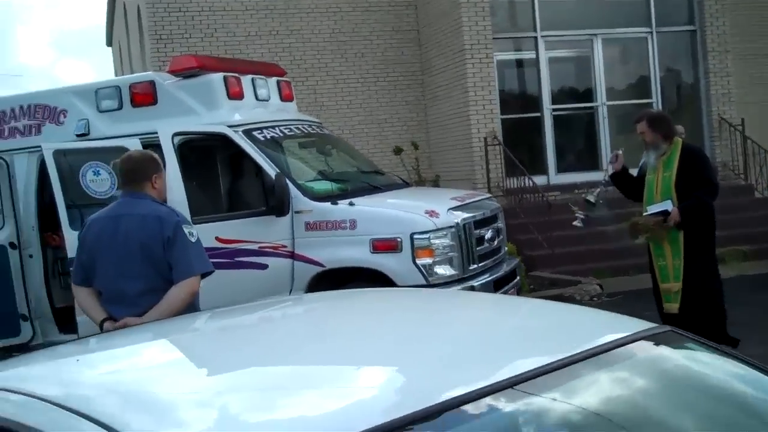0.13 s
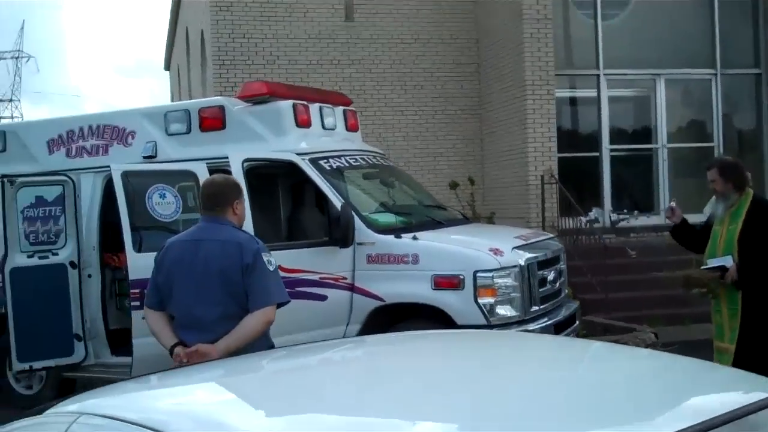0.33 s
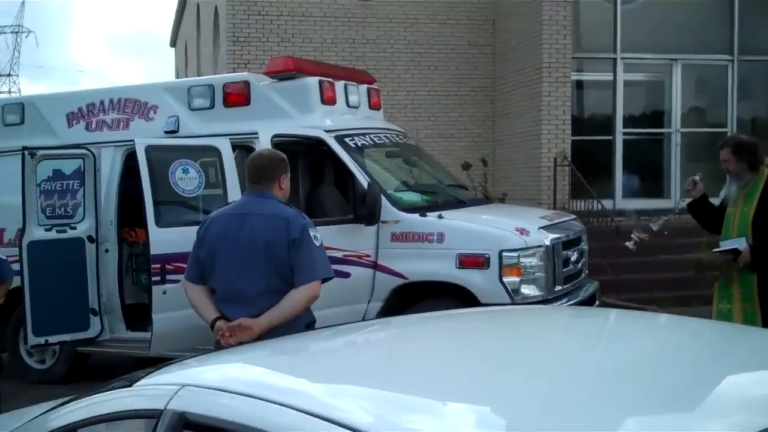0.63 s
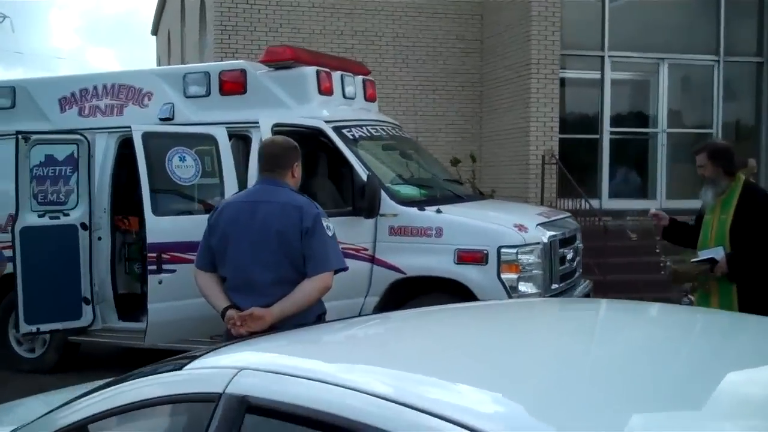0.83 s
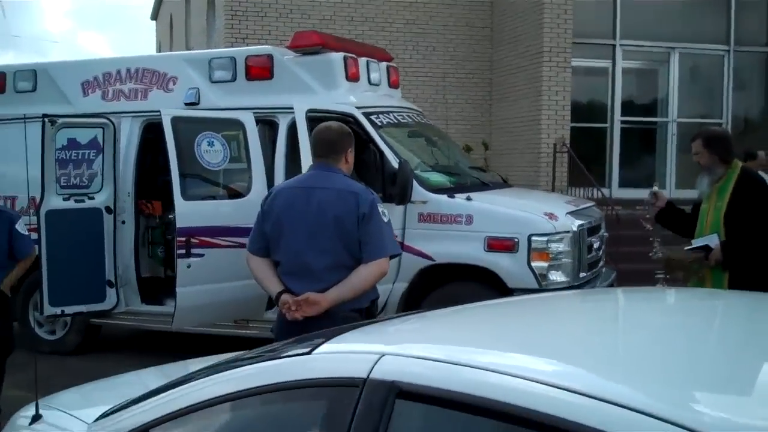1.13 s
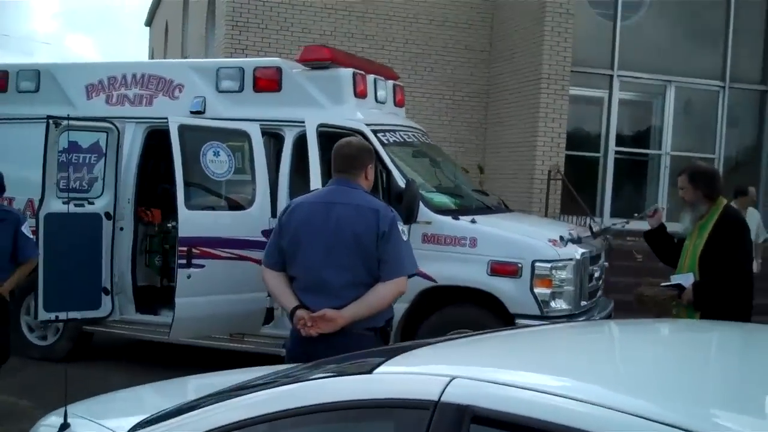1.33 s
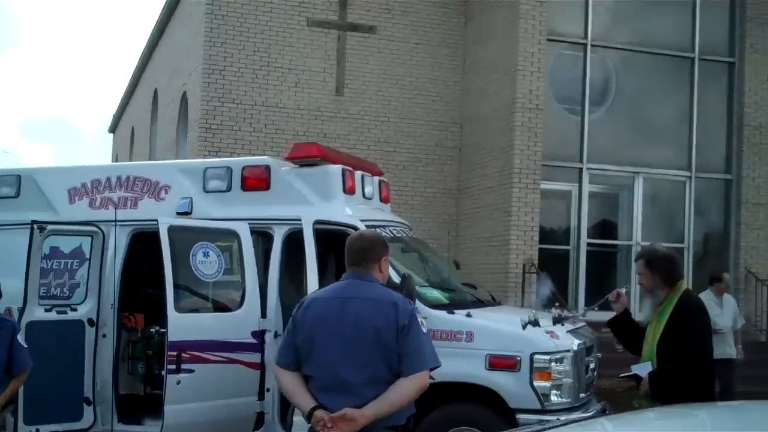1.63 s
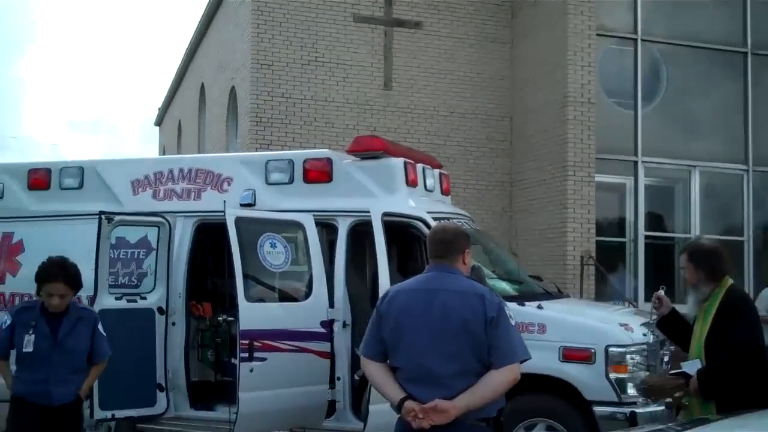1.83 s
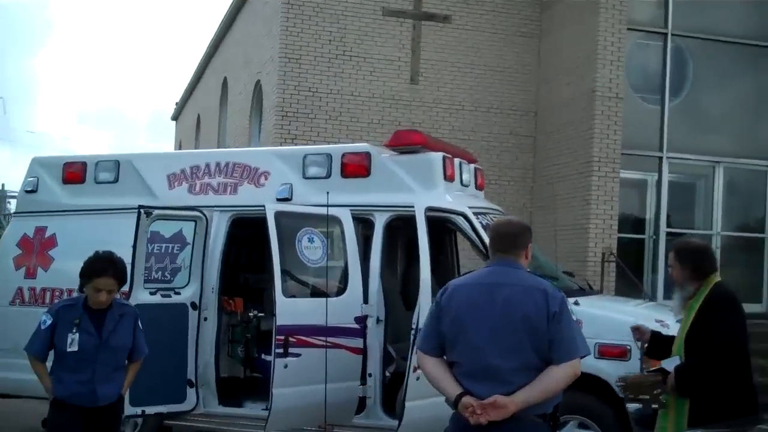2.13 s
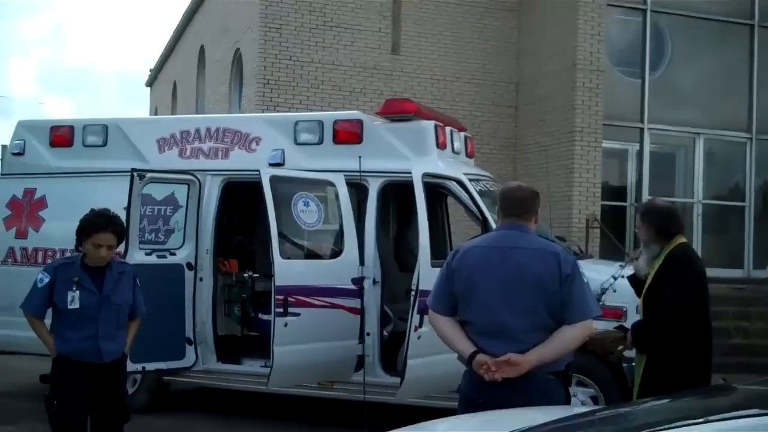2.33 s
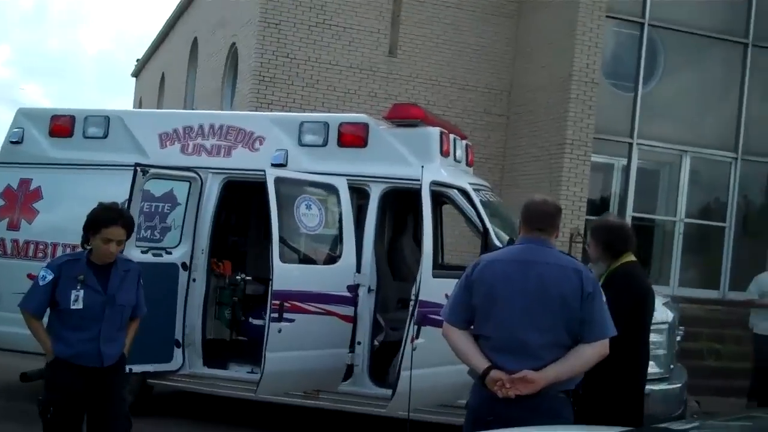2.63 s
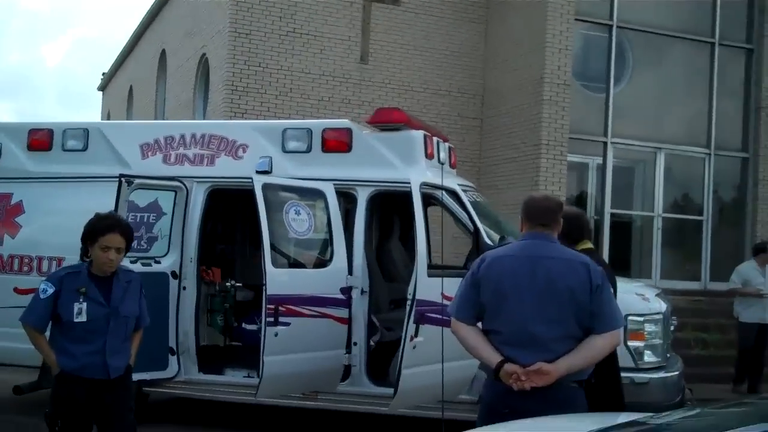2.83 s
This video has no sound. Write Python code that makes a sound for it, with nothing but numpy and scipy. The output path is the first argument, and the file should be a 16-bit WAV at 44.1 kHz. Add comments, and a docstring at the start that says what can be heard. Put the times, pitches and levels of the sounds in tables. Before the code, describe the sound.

Small bells on a swung censer jingle irregularly outdoors, thinning out over faint distant traffic.

```python
"""Jingling censer bells

Small slotted bells on the chains of a swung censer jingle in a car park, a few metres away.
Each jolt throws pellets against some bells: a burst of noise clicks and fading tones ring out.
Between jolts the pellets roll and tick, while the chain adds short tones and a fine hiss.
Shaped noise makes the distant traffic and a brick wall's answer; wavering tones make a faint hum."""
import sys
import numpy as np
from scipy import signal
from scipy.fft import rfft, irfft, next_fast_len
from scipy.io import wavfile
from scipy.ndimage import map_coordinates

SR = 44100
rng = np.random.default_rng(int(sys.argv[2]) if len(sys.argv) > 2 else 0)


def output_pcm(signal):
    """Save a mono or channel-first signal as 16-bit PCM at the path in sys.argv[1].

    Samples are clipped to [-1, 1] before scaling.
    """
    pcm = np.clip(np.atleast_2d(signal).T, -1, 1) * 32767
    wavfile.write(sys.argv[1], SR, np.round(pcm).astype(np.int16))


N = 132300  # samples: three seconds


def amp(db):
    """Turn decibels into a plain multiplier."""
    return 10 ** (np.asarray(db) / 20)


def unit(x):
    """Scale a sound to an average (rms) level of 1."""
    return x / np.sqrt(np.mean(x ** 2) + 1e-20)


def along(points, hz):
    """Read a curve of (f/Hz, value) points, with pitch on a log axis."""
    f, value = np.transpose(points)
    return np.interp(np.log(hz + 1), np.log(f + 1), value)


def wobble(rate):
    """A smooth random curve through `rate` random points a second."""
    knots = rng.standard_normal(int(N * rate / SR) + 4)
    return map_coordinates(knots, [np.arange(N) * rate / SR])


def filtered(x, response):
    """Change the strength and timing of each frequency in x."""
    m = next_fast_len(N + SR // 2)  # spare room at the end
    spectrum = rfft(x, m) * response(np.fft.rfftfreq(m, 1 / SR))
    return irfft(spectrum, m)[..., :N]


def train(times, sizes):
    """Single-sample blows of the given sizes at the given seconds."""
    return np.bincount(np.clip((times * SR).astype(int), 0, N - 1), sizes, N)


def fading(blows, t60):
    """Each blow starts a level that falls by 60 dB in t60 seconds."""
    return signal.lfilter([1], [1, -amp(-60 / (t60 * SR))], blows)


# Bell tones (modes) in seven families, low to high: f/Hz, level/dB, t60/s (time to fade by 60 dB)
BELL_FAMILIES = [
    [(2510, -3, 0.027), (2430, -9, 0.35), (2450, -8.5, 0.22), (2513, -3, 0.11), (2643, -20.5, 0.17)],
    [(2990, 0, .28)],
    [(3198, 0, .3)],
    [(3578, 0, .22)],
    [(3768, -5, .2), (3978, 0, .3)],
    [(4980, 0, 0.057), (5100, -2.5, 0.04)],
    [(6100, -16, 0.1), (6680, -4, 0.025), (7080, -2.5, 0.049), (7080, -0.5, 0.031), (7574, -4, 0.02),
     (7540, -11.5, 0.18), (8020, -12, 0.05), (7170, 2, 0.013)],
]
# How strongly rolling pellets wake each family: level/dB
ROLL_FAMILY_LEVELS = [-6, -25, -12, -12.5, -55.5, -33, 0]
# Share of the flutter in each family: a plain multiplier
FAMILY_FLUTTER = [0.98, 0.54, 1, 0.94, 1.5, 0.77, 0.85]
RING_SCATTER_DB, RING_LATE_S = 1.5, 0.0012  # per mode and jolt; pellets land a little apart
ROLL_DB, TICK_SCATTER_DB, MODE_SCATTER_DB = -17.5, 6, 8.5


def bells(jolts, shake):
    """Jolts and rolling ticks strike the same modes, and each mode rings at its own pitch."""
    modes = sum(len(family) for family in BELL_FAMILIES)
    jolt_s, jolt_ring_db = jolts[:, 0], jolts[:, 2:].T
    jolt_luck = rng.standard_normal((len(jolts), modes))
    late_s = RING_LATE_S * rng.random((len(jolts), modes))
    ticks = rng.integers(N, size=600)
    tick_size = shake[ticks] * amp(ROLL_DB + TICK_SCATTER_DB * rng.random(len(ticks)))
    tick_luck = np.clip(rng.standard_normal((len(ticks), modes)), -2, 2)
    out, k = np.zeros(N), 0
    families = zip(BELL_FAMILIES, jolt_ring_db, ROLL_FAMILY_LEVELS, FAMILY_FLUTTER)
    for family, ring_db, roll_db, rough in families:
        for hz, db, t60 in family:
            jolt_size = amp(ring_db + RING_SCATTER_DB * jolt_luck[:, k])
            jolt_blows = train(jolt_s + late_s[:, k], jolt_size)
            mode_tick_size = tick_size * amp(roll_db + MODE_SCATTER_DB * tick_luck[:, k])
            tick_blows = train(ticks / SR, mode_tick_size)
            out = out + amp(db) * ring(jolt_blows + tick_blows, hz, t60, rough)
            k += 1
    return out


ATTACK_S = 0.00017  # time constant of a ring's rise
FLUTTER_DB, FLUTTER_RAD, FLUTTER_PER_S = 4, 1, 70  # pellets touch and damp the turning bells


def ring(blows, hz, t60, rough):
    """One mode answers each blow: it rises quickly, fades, and flutters in level and phase."""
    turn = np.exp(2j * np.pi * hz / SR)  # one sample's step of the tone
    rise = np.exp(-1 / (ATTACK_S * SR))
    poles = np.convolve([1, -amp(-60 / (t60 * SR)) * turn], [1, -rise * turn])
    flutter_level = amp(rough * FLUTTER_DB * wobble(FLUTTER_PER_S))
    flutter_phase = np.exp(1j * rough * FLUTTER_RAD * wobble(FLUTTER_PER_S))
    tone = signal.lfilter([1 - rise], poles, blows)
    return (tone * flutter_level * flutter_phase).imag


# Balance of low and high in metal on metal, relative only: f/Hz, level/dB
METAL_COLOUR = [(1200, -91), (2500, -3), (4500, -13.5), (7200, -5), (9000, -17.5), (11500, -28.5),
                (14200, -32)]
CLICK_WIDTH = 0.48  # left-right difference


def metal_noise(colour_db):
    """Stereo noise coloured like metal: a shared part, plus a part opposite in left and right."""
    mid, side = unit(filtered(rng.standard_normal((2, N)), lambda hz: amp(colour_db(hz))))
    return np.array([mid + CLICK_WIDTH * side, mid - CLICK_WIDTH * side])


CLICK_DB, CLICK_T60_S = -19, 0.016  # added to each jolt's click level; fade time


def clicks(jolts):
    """Each jolt is a short bright burst of noise, metal on metal."""
    fade = fading(train(jolts[:, 0], amp(jolts[:, 1] + CLICK_DB)), CLICK_T60_S)
    return fade * metal_noise(lambda hz: along(METAL_COLOUR, hz))


# Rolling pellets and shaking chain, the slow swing: t/s, level/dB
ROLLING = [(0, -35.5), (.42, -42), (0.462, -26), (.54, -26), (.62, -34), (.8, -34.5), (1.0, -32),
           (1.3, -33.5), (1.45, -42.5), (1.571, -26.5), (1.7, -29), (1.88, -33.5), (2.05, -29), (2.2, -35),
           (2.602, -42.5), (2.669, -25.5), (2.76, -36.5), (3, -39.5)]
SETTLE_DB, SETTLE_T60_S = -30.5, 0.15  # bouncing after each jolt, over its click level


def shaking(jolts):
    """How hard pellets and links move: the slow swing plus bouncing that fades after each jolt."""
    bouncing = fading(train(jolts[:, 0], amp(jolts[:, 1] + SETTLE_DB)), SETTLE_T60_S)
    swing_db = np.interp(np.arange(N) / SR, *np.transpose(ROLLING))
    return amp(swing_db) + bouncing


SWISH_DB, SWISH_GRAIN_DB = -13, 5  # sliding links, over the shaking; their unevenness
CHAIN_BRIGHT_DB = 3.5  # extra treble over that of a click, per octave
CHAIN_DB, CHAIN_SCATTER_DB = -6.5, 13.5  # link against link, over the shaking
LINK_T60_S, LINK_PAN_DB = 0.05, 4.5  # middle fade time of a link; left-right scatter


def chain(shake):
    """Links clink against each other, each at its own pitch, and slide in a fine hiss."""
    def colour_db(hz):
        return along(METAL_COLOUR, hz) + CHAIN_BRIGHT_DB * np.log2((hz + 1) / 7200)

    noise = metal_noise(colour_db)
    swish = amp(SWISH_DB + SWISH_GRAIN_DB * wobble(FLUTTER_PER_S)) * shake * noise
    at, luck = rng.integers(N, size=5000), rng.random((5000, 4))
    hz = 2200 * (14000 / 2200) ** luck[:, 0]
    size = shake[at] * amp(CHAIN_DB + colour_db(hz) + CHAIN_SCATTER_DB * luck[:, 1])
    n = np.arange(SR // 30)  # each clink is cut after a thirtieth of a second
    t60 = LINK_T60_S * (.5 + luck[:, 2:3])
    fade = amp(-60 * n / SR / t60)
    tones = size[:, None] * fade * np.sin(2 * np.pi * hz[:, None] * n / SR)
    pan = amp(LINK_PAN_DB * (2 * luck[:, 3:] - 1.5))  # most links lean to the right
    spots = (at[:, None] + n).ravel()
    clinks = [np.bincount(spots, (tones * gain).ravel(), N)[:N] for gain in (pan, 1 / pan)]
    return swish + np.array(clinks)


# Knocks on the censer's bowl: t/s, level/dB
BOWL_KNOCKS = [(.9834, -31)]


def bowl():
    """A knock makes the bowl ring with one steady tone that fades away."""
    knock_s, knock_db = np.transpose(BOWL_KNOCKS)
    return ring(train(knock_s, amp(knock_db)), hz=1762, t60=0.23, rough=0)


# How quickly the wall's answer dies at each pitch: f/Hz, t60/s
WALL_FADE = [(2000, 0.23), (12000, 0.17)]
WALL_DB, WALL_DELAY_S = -13, 0.0055


def wall(x):
    """The brick wall answers with a short noise tail; each frequency dies at its own speed."""
    hz, t, z = signal.stft(rng.standard_normal((2, SR // 3)), SR, nperseg=256)
    fade = amp(-60 * t / along(WALL_FADE, hz)[:, None])
    tail = signal.istft(z * fade, SR, nperseg=256)[1]
    late = np.pad(x, (round(WALL_DELAY_S * SR), 0))[None]
    answer = signal.fftconvolve(late, tail / np.linalg.norm(tail[0]), axes=1)[:, :N]
    return amp(WALL_DB) * answer


# Balance of low and high in the traffic, relative only: f/Hz, level/dB (per Hz)
TRAFFIC_COLOUR = [(18, -9), (60, 3.5), (240, 0), (900, 1), (2000, -6.5), (4500, -13), (10000, -61),
                  (14000, -45)]
# How alike left and right are: f/Hz, likeness (1 means the same)
TRAFFIC_LIKENESS = [(30, 0.76), (100, 0.94), (500, 0.96), (1500, 0.69), (4000, 0.18)]
TRAFFIC_DB = -37.5


def traffic():
    """Far traffic is a smooth rush of noise, nearly the same in both ears in the bass."""
    def mid_and_side(hz):
        angle = np.arccos(np.clip(along(TRAFFIC_LIKENESS, hz), -1, 1)) / 2
        return amp(along(TRAFFIC_COLOUR, hz)) * [np.cos(angle), np.sin(angle)]

    mid, side = filtered(rng.standard_normal((2, N)), mid_and_side)
    return amp(TRAFFIC_DB) * unit(np.array([mid + side, mid - side]))


# Machine tones: f/Hz, level/dB (rms at the start, before the wavering)
HUM_TONES = [(119, -54), (329, -48), (658, -54)]
HUM_WAVER_DB, HUM_WAVER_RAD, HUM_FADE_DB_PER_S = 1.5, .7, 2


def hum():
    """Faint machine tones, slightly unsteady in level and phase, slowly fade."""
    t, out = np.arange(N) / SR, np.zeros(N)
    for hz, db in HUM_TONES:
        level = amp(db - HUM_FADE_DB_PER_S * t + HUM_WAVER_DB * wobble(3.04))
        phase = 2 * np.pi * hz * t + HUM_WAVER_RAD * wobble(6.39)
        out = out + np.sqrt(2) * level * np.sin(phase)
    return out


# Jolts of the censer: t/s, click level/dB, then the ring level/dB of each bell family, low to high
JOLT_BLOWS = [(0.2036, -12, -41, -28.5, -59, -30.5, -48, -42, -23.5),
              (0.2867, -10.5, -22.5, -57, -54, -54, -53, -27, -21.5),
              (0.4676, -6, -21.5, -18.5, -36, -33, -42, -29, -25),
              (0.4932, 1, -11.5, -18, -42, -47, -32, -32, -24),
              (0.5029, -8, -37, -32, -26, -24, -38, -32, -12.5),
              (0.516, -9, -32, -31, -26, -22, -53, -19, -13.5),
              (0.623, 1, -44, -19.5, -25, -34.5, -39, -25, -18),
              (0.8298, -1, -26.5, -30, -52, -32, -46, -20.5, -33),
              (0.8855, -6, -23.5, -41, -36, -56, -46, -41, -25),
              (0.9567, -4, -45, -39, -41, -43, -42, -36, -25),
              (0.983, 0.5, -26.5, -47, -41, -38, -50, -26, -17.5),
              (1.0255, -1.5, -28, -51, -31, -25, -41, -26, -14),
              (1.047, -17, -29, -50, -26.5, -42, -52, -27, -21.5),
              (1.134, -34, -47, -52, -49, -43, -61, -45, -30.5),
              (1.1758, -21, -34, -55, -54, -51, -59, -32, -27.5),
              (1.2133, -3, -20, -55, -63, -47, -53, -27, -28),
              (1.282, -4, -24, -56, -56, -53, -42, -16.5, -46),
              (1.4401, -11, -60, -41, -37.5, -58, -55, -54, -27),
              (1.4811, -5, -39, -51, -43, -44, -51, -44, -16),
              (1.495, -41, -28, -48, -50, -51, -53, -27, -52),
              (1.5901, 2.5, -27, -45, -36, -19.5, -31.5, -29, -12.5),
              (1.6364, 3, -23, -14, -43, -42, -30, -11.5, -20),
              (1.7686, -9, -24, -20.5, -32, -29.5, -36, -30, -24.5),
              (1.7853, -7, -19.5, -40, -52, -53, -37.5, -44, -22),
              (1.898, -3.5, -29, -28, -24.5, -19.5, -32.5, -27, -15.5),
              (1.9577, -14, -52, -58, -26.5, -31.5, -40, -34, -17),
              (2.0276, -26, -18.5, -59, -58, -46, -52, -58, -46),
              (2.0445, 4.5, -13, -31, -31, -40, -38, -36, -9.5),
              (2.0995, 2.5, -37, -44, -27.5, -30, -40, -30, -12.5),
              (2.169, -35, -24, -40, -59, -39, -50, -25.5, -27.5),
              (2.2541, -33, -23, -57, -56, -57, -52, -49, -56),
              (2.421, -4, -40, -46, -36.5, -43, -44, -33, -21),
              (2.531, -7, -34, -57, -50, -39, -35, -52, -32),
              (2.667, -30, -26, -25.5, -35, -47, -39, -47, -44),
              (2.797, -23, -42, -29.5, -42, -59, -58, -56, -38),
              (2.9924, -13, -26, -35, -50, -49, -46, -24.5, -45)]


def scene():
    """Jolts drive the jingle; the wall answers it, over traffic and hum."""
    jolts = np.array(JOLT_BLOWS)
    shake = shaking(jolts)
    jingle = bells(jolts, shake) + clicks(jolts) + chain(shake) + bowl()
    return jingle + wall(jingle.mean(axis=0)) + traffic() + hum()


# Left microphone port over the right one: f/Hz, level/dB
LEFT_OVER_RIGHT = [(60, -0.5), (540, 0), (1640, 1.5), (4950, 2), (14900, 21.5)]
LEFT_LAG_S, TOP_HZ = .000025, 14250
CEILING = .92  # peaks round off here; also the final gain


def record(dry):
    """The left port hears more treble, a hair later; peaks round off and the top is cut."""
    side = np.array([[.5], [-.5]])  # left and right share each difference equally

    def ports(hz):
        lag = np.exp(-2j * np.pi * hz * side * LEFT_LAG_S)
        return amp(side * along(LEFT_OVER_RIGHT, hz)) * lag

    x = filtered(dry, ports)
    x = x / (1 + np.abs(x / CEILING) ** 6) ** (1 / 6)
    return CEILING * filtered(x, lambda hz: hz < TOP_HZ)


dry = scene()
out = record(dry)
output_pcm(out)
```